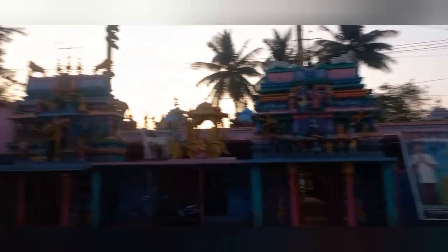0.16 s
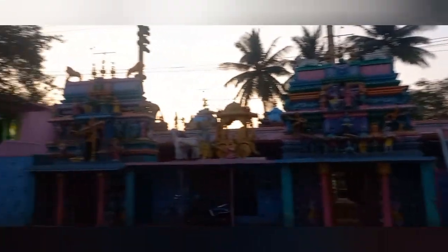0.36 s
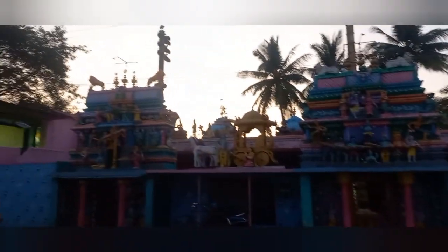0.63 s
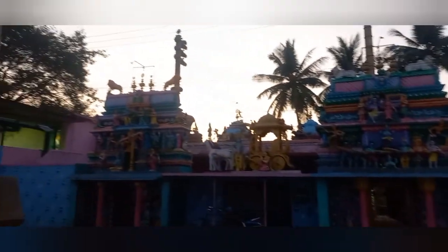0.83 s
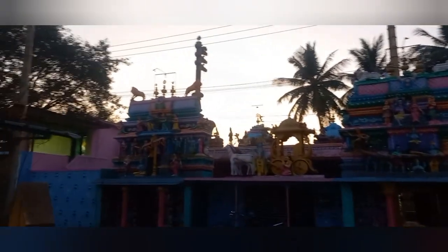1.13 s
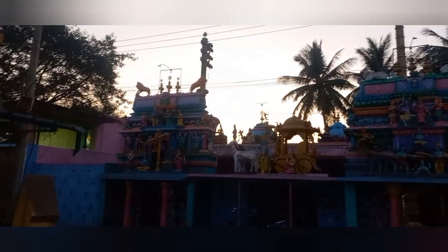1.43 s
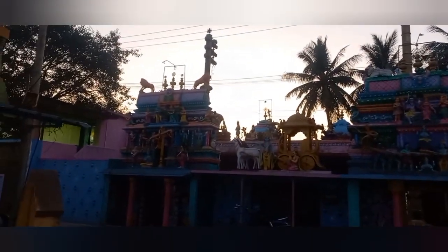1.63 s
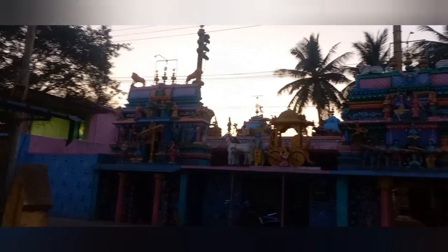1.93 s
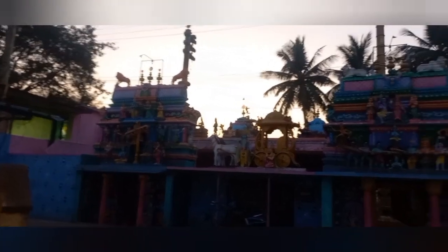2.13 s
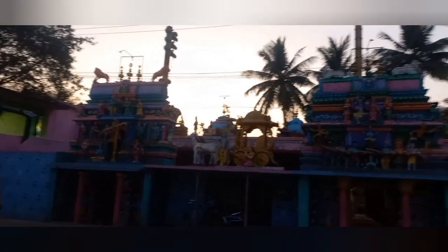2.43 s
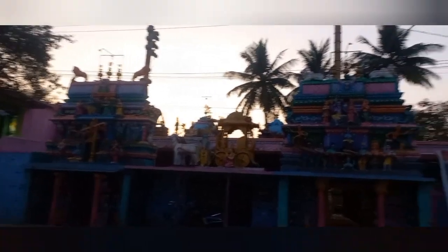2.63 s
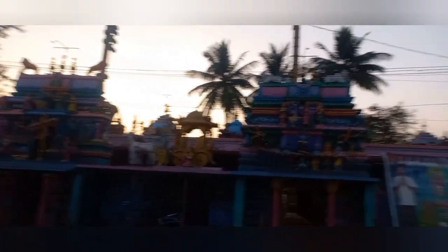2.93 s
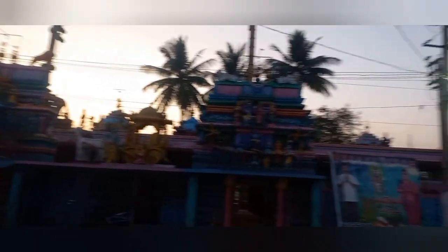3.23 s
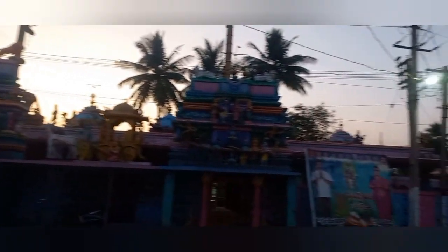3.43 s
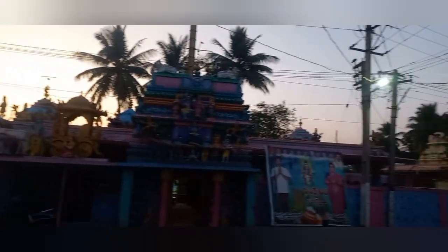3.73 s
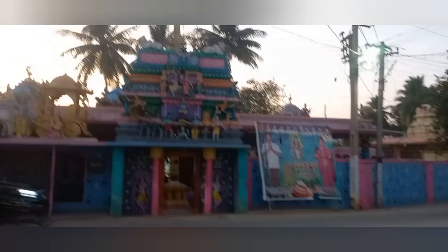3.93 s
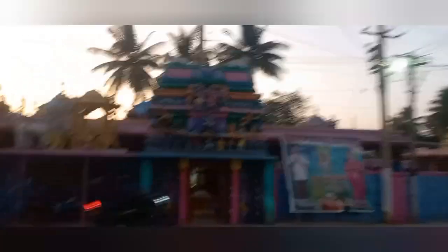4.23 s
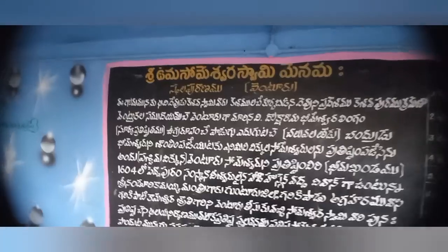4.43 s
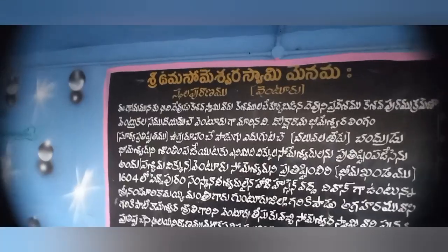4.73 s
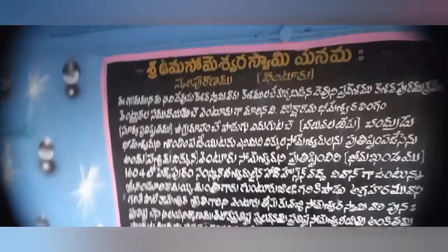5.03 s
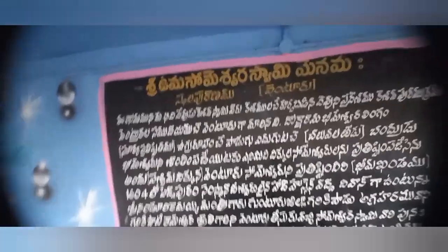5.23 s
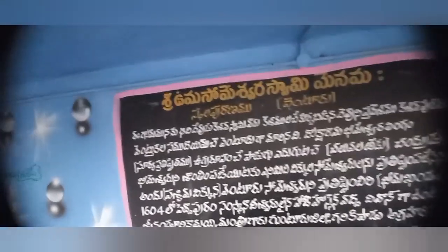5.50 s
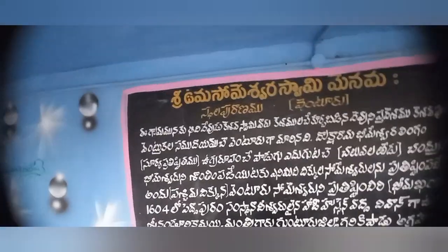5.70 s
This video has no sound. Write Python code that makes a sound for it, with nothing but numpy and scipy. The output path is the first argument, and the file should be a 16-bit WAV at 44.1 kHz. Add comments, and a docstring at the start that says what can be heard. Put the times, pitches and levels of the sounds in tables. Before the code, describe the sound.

Fast, shrill cricket trilling dominates a dusky village roadside while faint horns sound far off and a small engine approaches, speeding up.

```python
"""A cricket close to the microphone chirps ten times a second at dusk by a village road: decaying wing rings.
Behind it three distant horns sound (beating, fluttering partials); one small engine idles briefly and
another speeds up as it nears (multiples of the firing rate). A mains transformer buzzes in steady harmonics
with faint whines and a tick. Far crickets, insect fizz and traffic are shaped noise from all around.
Two close microphone ports hear the treble differently."""
import sys
import numpy as np
from scipy import signal
from scipy.fft import rfft, irfft, next_fast_len
from scipy.io import wavfile
from scipy.ndimage import uniform_filter1d

SR = 44100
rng = np.random.default_rng(int(sys.argv[2]) if len(sys.argv) > 2 else 0)


def materialize(psi):
    """Save the field psi as 16-bit PCM at rate SR to the path in sys.argv[1].

    A 1-D psi becomes a single channel; in a 2-D psi each row is a channel.
    """
    bounded = np.clip(np.atleast_2d(psi).T, -1, 1)
    quanta = np.round(bounded * 32767).astype(np.int16)
    wavfile.write(sys.argv[1], SR, quanta)


N = 258424

# Near cricket's chirps, in five runs between short pauses. Each row: strongest stroke in seconds, level in dB.
CHIRPS = [(0.0078, -20.5), (0.1028, -20), (0.1984, -18.5), (0.303, -20.5), (0.4062, -20.5), (0.5145, -19.6),
          (0.6217, -20.3), (0.7214, -21), (0.818, -21.5), (0.9147, -20.5), (1.011, -20), (1.1056, -19),
          (1.1994, -20), (1.3029, -20), (1.4733, -22), (1.569, -19.8), (1.6653, -21.5), (1.7633, -20.5),
          (1.8552, -22.5), (1.9466, -21.5), (2.0442, -20.2), (2.1405, -19.9), (2.237, -22), (2.3283, -21.1),
          (2.4164, -22.0), (2.5079, -22), (2.6011, -21.4), (2.698, -22), (2.7945, -20.5), (2.8879, -21),
          (2.983, -22), (3.0837, -21.5), (3.1826, -22.5), (3.3239, -22.4), (3.423, -20.7), (3.5197, -21),
          (3.6143, -20.7), (3.7062, -20.5), (3.7985, -20.8), (3.9589, -21), (4.0578, -19.5), (4.154, -21.5),
          (4.2495, -20.5), (4.345, -22), (4.4399, -21), (4.5343, -22), (4.6368, -26), (4.775, -22.2),
          (4.8789, -22.5), (4.9855, -21), (5.0861, -21), (5.1859, -20.5), (5.2911, -20.5), (5.3906, -19.5),
          (5.4897, -21.5), (5.5888, -21.0), (5.6841, -21.0), (5.78, -19.5)]
# Wing strokes of one chirp, in groups about 15 ms apart.
# Each row: seconds from the strongest stroke, mean pitch in Hz, mean level in dB over the chirp level.
STROKES = [(-.0318, 7000, -8.5), (-.0298, 6900, -8.5), (-.0268, 6700, -8), (-.0163, 6770, -1.5),
           (-.0133, 6950, -2), (-.0098, 6700, -7), (-.0032, 6950, -6), (.0004, 6780, 1.8),
           (.0039, 6820, -1.5), (.0087, 7250, -10), (.0120, 7000, -7), (.0138, 6920, -3.5),
           (.0168, 6850, -7.5), (.0199, 6850, -7), (.0252, 6900, -8.5), (.0281, 6950, -3.5),
           (.0305, 6900, -9), (.0364, 6850, -8), (.0446, 6820, -7.5)]
# Distant horns, one curve each. Each row: time in seconds, level of the leading partials in dB,
# level of the side partials in dB, pitch of the strongest partial in Hz.
HORN_CURVES = [
    [(0, -51, -56, 2830), (.06, -48, -58, 2830), (.1, -52, -59, 2845), (.14, -43, -54, 2868),
     (.175, -53, -53, 2855), (.205, -40, -53, 2842), (.24, -47, -53, 2860), (.3, -49, -52, 2855),
     (.345, -47, -56, 2850), (.372, -40, -59, 2857), (.405, -51, -56, 2838), (.44, -44, -51, 2852),
     (.48, -41, -53, 2858), (.51, -45, -59, 2854), (.54, -44, -62, 2850), (.56, -55, -63, 2850),
     (.62, -53, -63, 2855), (.7, -57, -70, 2870), (.78, -64, -76, 2868), (.82, -61, -80, 2865),
     (1.0, -65, -80, 2860), (1.12, -74, -80, 2860)],
    [(1.52, -76, -70, 3604), (1.56, -72, -63, 3604), (1.6, -66, -68, 3604), (1.64, -61, -65, 3604),
     (1.7, -60, -60, 3604), (1.78, -61, -63, 3604), (1.82, -71, -66, 3604), (1.88, -64, -71, 3602),
     (1.95, -64, -62, 3600), (2.05, -63, -59, 3600), (2.12, -61, -66, 3602), (2.17, -59, -58, 3604),
     (2.22, -58.5, -67, 3604), (2.28, -58.5, -61, 3600), (2.31, -67, -61, 3598), (2.37, -71, -68, 3600),
     (2.42, -62, -61, 3604), (2.51, -61, -67, 3606), (2.55, -70, -74, 3606), (2.62, -78, -78, 3606)],
    [(4.38, -72, -74, 3290), (4.44, -61, -70, 3290), (4.48, -53, -66, 3278), (4.52, -50, -64, 3282),
     (4.545, -52, -62, 3288), (4.565, -42, -59, 3293), (4.6, -48, -61, 3290), (4.62, -50, -61, 3288),
     (4.645, -46, -62, 3284), (4.675, -48, -62, 3262), (4.71, -52, -66, 3268), (4.75, -53, -70, 3266),
     (4.77, -58, -72, 3266), (4.79, -53, -72, 3268), (4.83, -55, -74, 3270), (4.86, -63, -78, 3266),
     (4.89, -58, -78, 3262), (4.97, -62, -78, 3264), (5.0, -65, -78, 3264), (5.08, -74, -78, 3264)],
]
# Partials of each horn that rise out of the traffic; a weaker twin just under each beats with it.
# Each row: frequency in Hz, flutter width in Hz, level in dB over the curve, group (1 leading, 2 side),
# beats per second, size of the twin (0-1).
HORN_PARTIALS = [
    [(2850, 60, 1, 1, 31, .35), (3255, 45, -1, 2, 30, .55), (3670, 90, -2.5, 2, 41, .4),
     (4060, 90, -15, 2, 25, .4)],
    [(3148, 60, -1, 2, 20, .4), (3604, 45, .5, 1, 17, .2), (4050, 80, -10, 1, 9, .6)],
    [(1830, 50, -10, 1, 16, .3), (2905, 90, -3, 2, 25, .6), (3293, 55, 1.5, 1, 28, .4),
     (3635, 90, -6, 2, 31, .6), (4350, 100, -4, 2, 22, .7)],
]
# Manner of each horn. Each row: flutter share of the leading partials (0-1), of the side partials (0-1),
# how far the side partials follow the pitch (0-1), moment of release in seconds.
HORN_MANNERS = [(.5, .6, 0, .55), (.35, .55, 1, 2.53), (.35, .8, 1, 4.72)]
# Two brief touches of the last horn's low partial, near 1840 Hz, as it swells.
# Each row: middle in seconds, peak level in dB.
HORN_TOUCHES = [(4.49, -45), (4.553, -38.5)]
# Small engines, one curve each. Each row: time in seconds, firings per second, level in dB over the exhaust.
ENGINE_CURVES = [
    [(.8, 25, -57), (1.1, 28, -40), (1.4, 28.6, -36.5), (1.7, 28, -41.5), (2.2, 27.8, -65)],
    [(2.1, 19, -52), (2.35, 20.5, -43), (2.9, 20.5, -45), (3.1, 23.4, -33.5), (3.3, 20, -42),
     (3.55, 20.8, -33), (4.2, 25.3, -34), (4.45, 24.7, -37.5), (4.6, 26, -28.5), (4.95, 28.2, -29.5),
     (5.27, 28.4, -34), (5.62, 32.8, -24), (5.86, 33.2, -27.5)],
]
# Exhaust and standing waves of the street. Each row: frequency in Hz, level in dB.
EXHAUST = [(52, -29), (62, -13), (85, -19), (98, -20), (110, -6), (126, 0), (134, -2), (145, 3.5),
           (156, -11.5), (166, 0), (178, -11), (190, -20), (260, -18)]
# Transformer buzz. Each entry: multiple of twice the mains frequency, level in dB rms.
BUZZ = {3: -43., 6: -58., 7: -68., 9: -63., 10: -64., 11: -55., 12: -55.5, 14: -56., 15: -58., 16: -62., 17:
        -51., 18: -49.6, 19: -69., 20: -70., 21: -68., 22: -70., 23: -70.}
# Faint wavering tones. Each row: frequency in Hz, width in Hz, level in dB rms.
WHINES = [(86.4, 6, -50), (224, 8.4, -58.5), (357, 10, -52.5), (929, 13, -60), (1037, 21, -53)]
# A faint high tick. Each row: start in seconds, level at onset in dB.
TICKS = [(2.3441, -42)]
# Spectrum of the far crickets. Each row: frequency in Hz, relative density in dB.
CHORUS_COLOUR = [(5000, -60), (5500, -30.5), (5900, -25.5), (6300, -12), (6600, -9.5), (7000, 5),
                 (7350, -2), (7650, -18), (7900, -19), (8700, -43.5), (9500, -67)]
# Spectrum of the high insect fizz. Each row: frequency in Hz, relative density in dB.
FIZZ_COLOUR = [(7000, -27), (8800, -14), (9500, -15), (10400, -6), (11800, -4), (12800, 4), (14000, 3),
               (15000, 1), (16000, -3.5)]
# Spectrum of the far traffic wash. Each row: frequency in Hz, relative density in dB.
STREET_COLOUR = [(30, -45), (50, -37), (65, -20), (90, 2), (130, -1.5), (208, -2.5), (412, -6), (855, -14),
                 (1290, -16.5), (1770, -18.5), (2300, -21.5), (4940, -32), (5800, -37.5), (7500, -51)]
# The two microphone ports. Each row: frequency in Hz, left over right in dB,
# radians by which the left leads, likeness of diffuse sound at the two (0-1).
PORTS = [(60, .3, 0, .997), (140, .5, 0, .992), (300, .1, 0, .999), (700, 0, 0, .997), (1500, 0, 0, .9995),
         (2500, .1, 0, .999), (3250, .4, .03, .992), (3600, 1.6, .25, .88), (4500, 2.1, .45, .9),
         (5750, 3.2, .52, .9), (6250, 6.1, .72, .97), (6750, 7.8, .78, .99), (7300, 9.4, .81, .99),
         (7750, 10.6, .74, .93), (8250, 3., .2, .8), (8750, .3, .04, .85), (9800, -4, .22, .58),
         (11200, -3.8, .5, .6), (12500, -3.9, .92, .85), (14000, -1.7, .98, .89), (15500, 1.2, 1.05, .8)]


def cricket(uneven_db=0.5):
    """Each stroke rings the wing for a few ms, quick to start, slower to die, sagging in pitch; all differ."""
    out, t = np.zeros(N), np.arange(-250, 250) / SR
    rise_s, die_s, slip_s = .0007, .0011, .0003
    sag_hz, spread_hz = 160, 70  # the sag spans rise_s + die_s; the spread is by chance
    shape = np.exp(-.5 * (t / np.where(t < 0, rise_s, die_s)) ** 2)
    chance = rng.standard_normal((len(CHIRPS), len(STROKES), 4))
    for (chirp_s, chirp_db), draws in zip(CHIRPS, chance):
        for (offset_s, hz, stroke_db), (size, slip, pitch, phase) in zip(STROKES, draws):
            mean_hz = hz + spread_hz * pitch - sag_hz / 2 * t / (rise_s + die_s)
            turns = mean_hz * t + 10 * phase
            level = amp(chirp_db + stroke_db + uneven_db * size)
            ring = level * shape * np.sin(2 * np.pi * turns)
            add(out, chirp_s + offset_s + slip_s * slip + t[0], ring)
    return out


def yard(x, t60=0.14):
    """Walls and trees return a tail of echoes that builds up over 20 ms, nearly alike at both ports."""
    t = np.arange(SR // 2) / SR
    sizes = rng.standard_normal((2, SR // 2))
    taps = sizes * (rng.random((2, SR // 2)) < 4000 / SR)  # about 4000 echoes a second
    taps[1] = .98 * taps[0] + .15 * taps[1]
    taps *= amp(-60 * t / t60) * np.minimum(t / .02, 1)
    taps /= np.linalg.norm(taps[0])
    return signal.fftconvolve(x[None], taps, axes=1)[:, :N]


def horn(rows, manner, partials, apart=0.11):
    """Each partial is a tone with its twin and a fluttering halo, a little unlike at the two ports."""
    s, leading_db, side_db, pitch_hz = np.transpose(rows)
    leading_blur, side_blur, follow, let_go_s = manner
    # once a horn is let go, mostly its echoes are heard
    echo_blur, release_s = .85, .04
    t = np.arange(s[0], s[-1], 1 / SR)
    pitch = np.interp(t, s, pitch_hz)
    out = np.zeros((2, len(t)))
    nearest_hz = min(np.transpose(partials)[0], key=lambda hz: abs(hz - pitch.mean()))
    for hz, width_hz, partial_db, group, beat_hz, twin in partials:
        leads = group == 1
        bend = (pitch / nearest_hz) ** (1 if leads else follow)
        held_blur = leading_blur if leads else side_blur
        blur = np.interp(t, [let_go_s, let_go_s + release_s], [held_blur, echo_blur])
        common = np.sqrt(1 - blur ** 2) + blur * halo(width_hz, len(t))
        paths = common + apart * np.outer([1, -1], halo(width_hz, len(t)))
        twin_turns = beat_hz * t + rng.random()
        beats = (1 + twin * np.exp(-2j * np.pi * twin_turns)) / np.sqrt(1 + twin ** 2)
        level = amp(partial_db + np.interp(t, s, leading_db if leads else side_db))
        turns = hz * np.cumsum(bend) / SR + rng.random()
        out += level * 2 * (paths * beats * np.exp(2j * np.pi * turns)).real
    return s[0], out * signal.windows.tukey(len(t), .01)


def horn_touch(s, db, hz=1840, length_s=0.038):
    """A brief touch of the last horn's low partial: one tone with a soft start and end."""
    t = np.arange(-length_s / 2, length_s / 2, 1 / SR)
    return s + t[0], amp(db) * np.hanning(len(t)) * np.sin(2 * np.pi * hz * t)


def engine(rows, blur=.28, width_hz=8, unsteady=.005):
    """Multiples of the firing rate pass the exhaust and the street; each wavers in its own time."""
    s, rate, db = np.transpose(rows)
    t = np.arange(s[0], s[-1], 1 / SR)
    firing_hz = np.interp(t, s, rate) * (1 + unsteady * drift(8.0, len(t)))
    turns = np.cumsum(firing_hz) / SR
    orders = np.zeros(len(t), complex)
    for k in range(2, 11):
        waver = 1 - blur + blur * halo(width_hz, len(t))
        tone = np.exp(2j * np.pi * (k * turns + rng.random()))
        orders += amp(read(EXHAUST, k * firing_hz)) * waver * tone
    return s[0], orders.real * amp(np.interp(t, s, db))


def transformer(hum_hz=100.033, scatter=.17):
    """Steady multiples of twice the mains frequency, nearly in step, so the buzz pulses once a hum cycle."""
    t, out = np.arange(N) / SR, np.zeros(N)
    for k, db in BUZZ.items():
        phase = 2 * np.pi * (k * hum_hz * t + scatter * rng.standard_normal())
        out += amp(db) * np.sqrt(2) * np.cos(phase)
    return out


def whine(hz, width_hz, db):
    """A narrow tone that fades and wavers by chance."""
    tone = np.exp(2j * np.pi * hz * np.arange(N) / SR)
    return amp(db) * np.sqrt(2) * (halo(width_hz, N) * tone).real


def tick(s, db, hz=10500, ring_s=.0008):
    """One short high ring that dies away exponentially."""
    t = np.arange(200) / SR
    return s, amp(db) * np.exp(-t / ring_s) * np.sin(2 * np.pi * hz * t)


def chorus(throb_hz=68, throb_db=1.0):
    """Far crickets blur into a band that throbs unevenly at the stroke-group rate."""
    turns = np.cumsum(throb_hz * (1 + 0.103 * drift(13.2, N))) / SR
    band = diffuse(CHORUS_COLOUR, -35, patchy_db=.4, ripple_db=2.)
    return band * amp(throb_db * np.sin(2 * np.pi * turns))


def fizz(near, follow=0.16):
    """Insect fizz, noise high in the treble, swells a little with each near chirp."""
    power = uniform_filter1d(near ** 2, 500)
    swell = (power / power.mean() + 0.39) ** follow
    return diffuse(FIZZ_COLOUR, -60, patchy_db=1.0) * swell


def street():
    """Far traffic blurs into a low wash of noise from all around."""
    return diffuse(STREET_COLOUR, -36, patchy_db=0.88)


def diffuse(colour, db, patchy_db, ripple_db=0):
    """Noise from all around, alike at the ports by their likeness, with patches and a ripple from fixed walls."""
    frames, hz = N // 512 + 5, np.fft.rfftfreq(2048, 1 / SR)
    a, b, c, d, patches = rng.standard_normal((frames, 1025, 5)).T
    patches = evened(uniform_filter1d(uniform_filter1d(patches, 16, 0), 8, 1))
    ripple = rng.standard_normal((len(hz), 1))
    same = np.clip(read(PORTS, hz, column=3), 0, 1)[:, None]
    left, other = a + 1j * b, c + 1j * d
    z = np.array([left, same * left + np.sqrt(1 - same ** 2) * other])
    z *= amp(read(colour, hz)[:, None] + patchy_db * patches + ripple_db * ripple)
    noise = signal.istft(z, nperseg=2048, noverlap=1536)[1][:, :N]
    return amp(db) * evened(noise)


def halo(width_hz, size):
    """The wandering size and phase of a tone that arrives by many paths."""
    return (drift(width_hz, size) + 1j * drift(width_hz, size)) / np.sqrt(2)


def drift(rate_hz, size):
    """Slow chance of rms 1: noise averaged twice over half a period of the rate."""
    noise = rng.standard_normal(size)
    smooth = max(int(SR / rate_hz / 2), 1)
    return evened(uniform_filter1d(uniform_filter1d(noise, smooth), smooth))


def amp(db):
    """Amplitude factor for a level in dB."""
    return 10 ** (np.asarray(db) / 20)


def evened(x):
    """Scales a signal to rms 1."""
    return x / np.sqrt(np.mean(x ** 2) + 1e-20)


def read(points, hz, column=1):
    """Reads a table column on a log-frequency axis."""
    columns = np.transpose(points)
    return np.interp(np.log(hz + 1), np.log(columns[0] + 1), columns[column])


def add(mix, s, sound):
    """Lays a sound in at time s, cut at both ends."""
    at = round(s * SR)
    sound = sound[max(-at, 0):]
    part = mix[max(at, 0):][:len(sound)]
    part += sound[:len(part)]


def scene():
    """All sources, near to far, as they reach the microphone."""
    near = cricket()
    tail = amp(-8.) * yard(near)
    horns = np.zeros((2, N))
    for rows, manner, partials in zip(HORN_CURVES, HORN_MANNERS, HORN_PARTIALS):
        s, sound = horn(rows, manner, partials)
        add(horns[0], s, sound[0])
        add(horns[1], s, sound[1])
    touches = np.zeros(N)
    for row in HORN_TOUCHES:
        add(touches, *horn_touch(*row))
    engines = np.zeros(N)
    for rows in ENGINE_CURVES:
        add(engines, *engine(rows))
    lag = round(0.00011 * SR)  # the engines are off to one side and reach the left port first
    engines = np.array([engines, np.roll(engines, lag)])
    small_tones = transformer() + sum(whine(*row) for row in WHINES)
    for row in TICKS:
        add(small_tones, *tick(*row))
    background = chorus() + fizz(near + tail[0]) + street()
    return near + tail + horns + touches + engines + small_tones + background


def record(dry):
    """The ports share the treble unevenly in level and phase; a bass cut, then the band limit."""
    size = next_fast_len(N + 4096)
    hz = np.fft.rfftfreq(size, 1 / SR)
    # half of each difference goes to either port
    left = amp(read(PORTS, hz) / 2) * np.exp(.5j * read(PORTS, hz, column=2))
    ports = np.array([left, 1 / left])
    ports /= abs(ports.mean(0))  # keeps the level of the two ports' mean
    wet = irfft(rfft(dry, size) * ports, size)[:, :N]
    wet = signal.sosfilt(signal.butter(4, 48, "high", fs=SR, output="sos"), wet)
    band_limit = signal.firwin(1023, 15730, window=("kaiser", 10), fs=SR)  # low-pass, edge in Hz
    return signal.oaconvolve(wet, band_limit[None], "same")


dry = scene()
out = record(dry)
materialize(out)
```